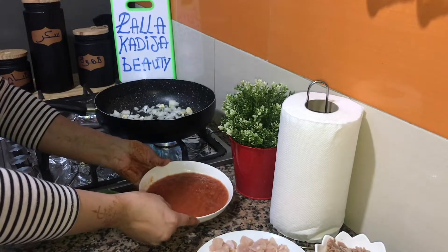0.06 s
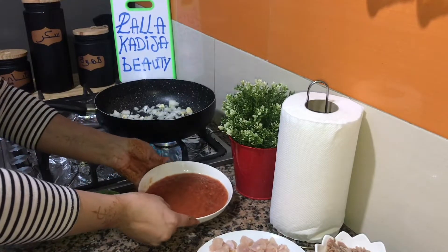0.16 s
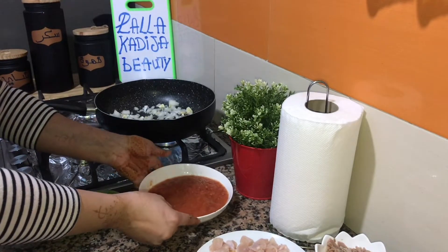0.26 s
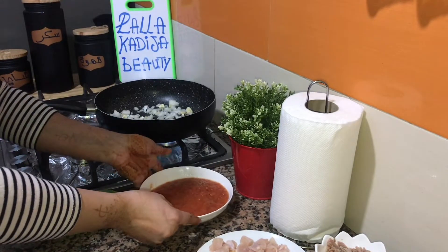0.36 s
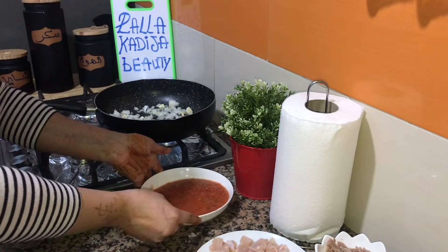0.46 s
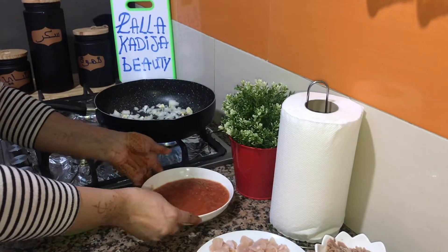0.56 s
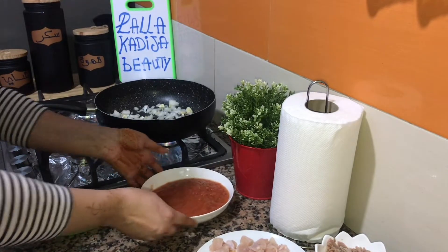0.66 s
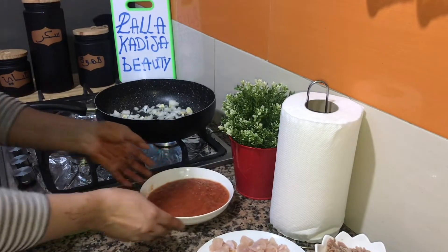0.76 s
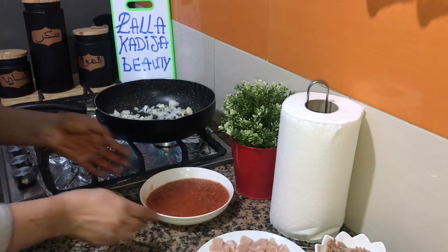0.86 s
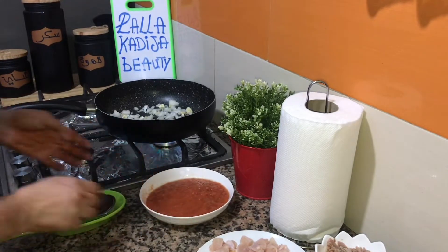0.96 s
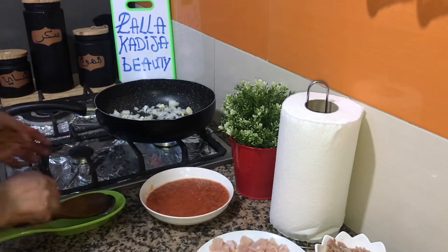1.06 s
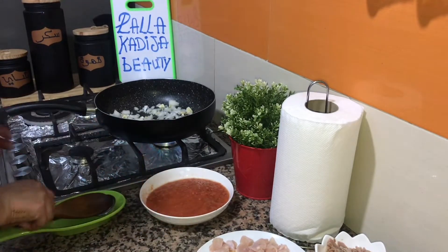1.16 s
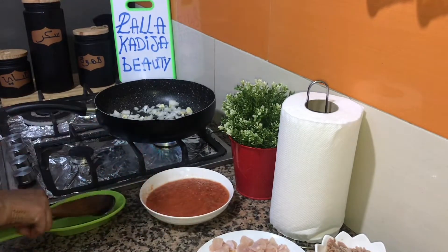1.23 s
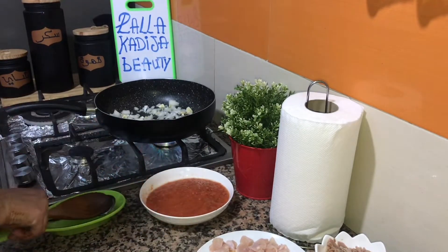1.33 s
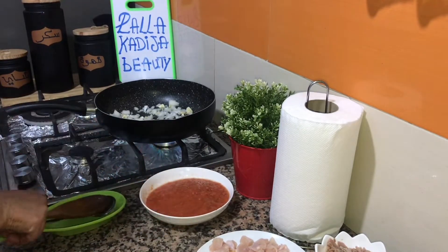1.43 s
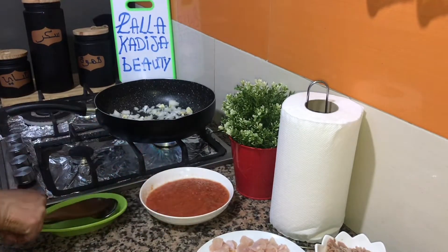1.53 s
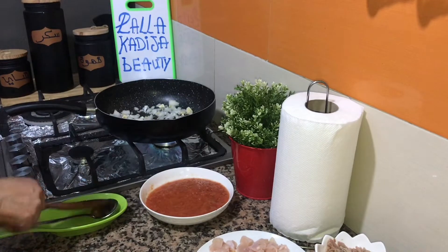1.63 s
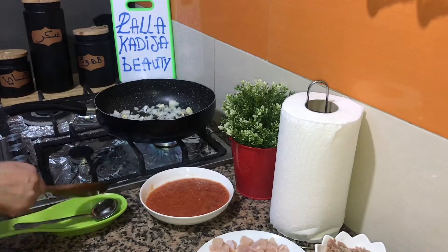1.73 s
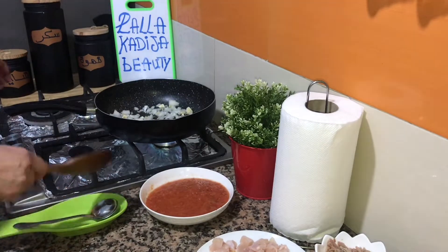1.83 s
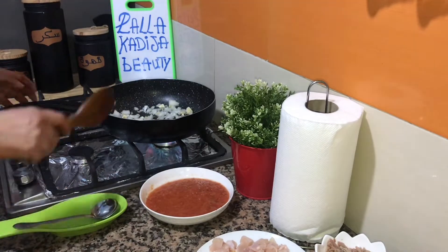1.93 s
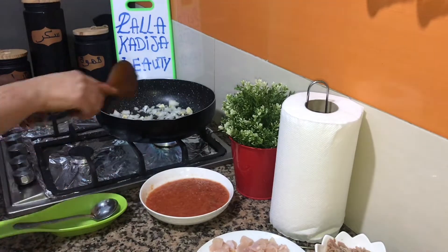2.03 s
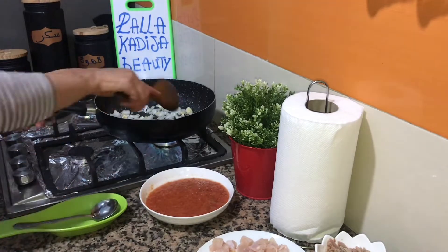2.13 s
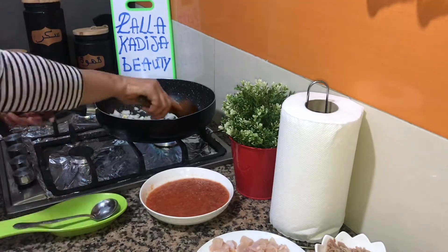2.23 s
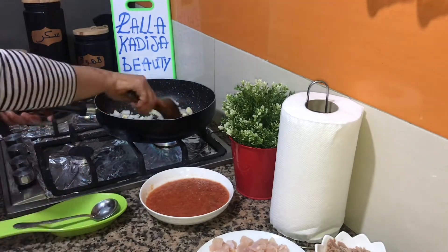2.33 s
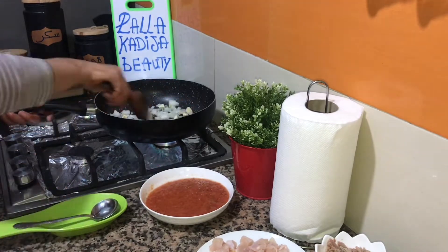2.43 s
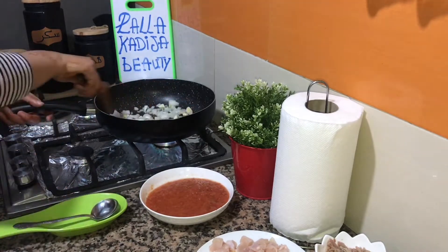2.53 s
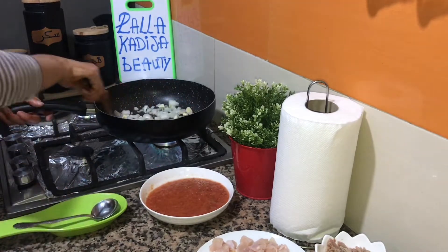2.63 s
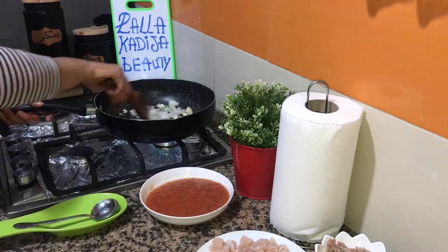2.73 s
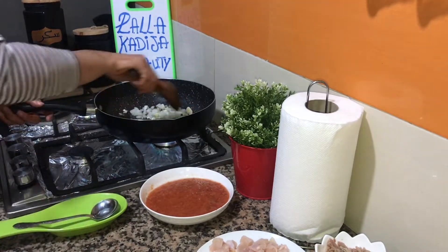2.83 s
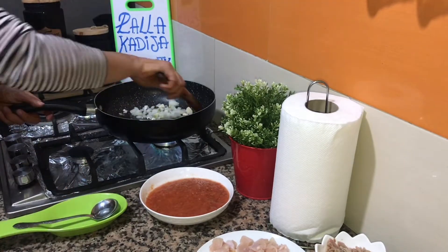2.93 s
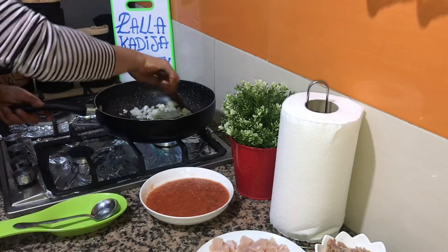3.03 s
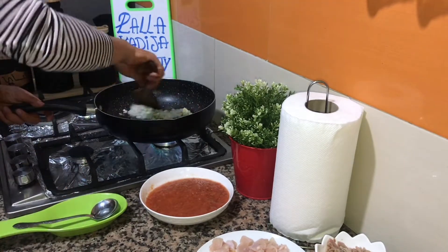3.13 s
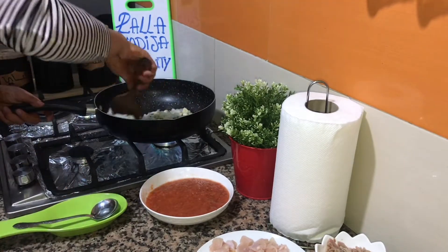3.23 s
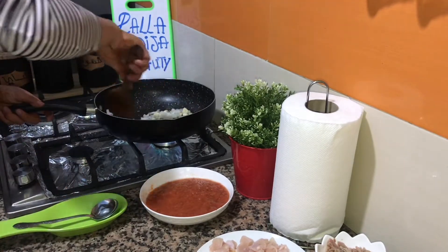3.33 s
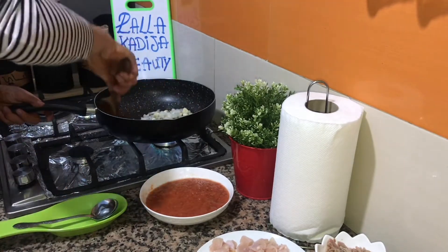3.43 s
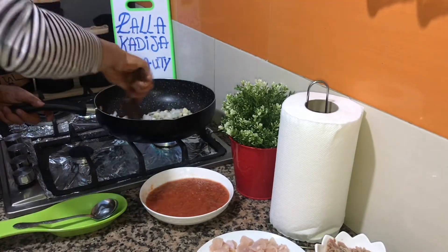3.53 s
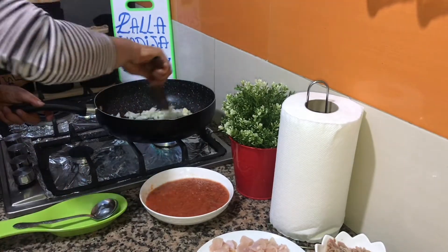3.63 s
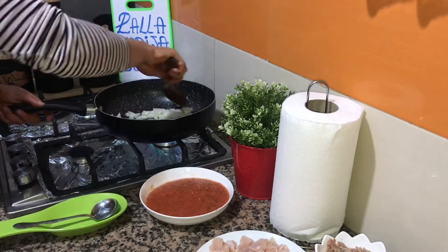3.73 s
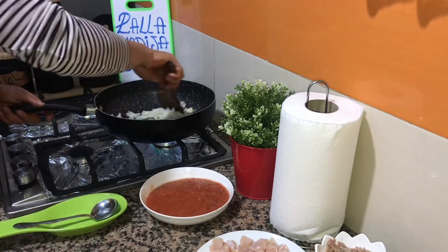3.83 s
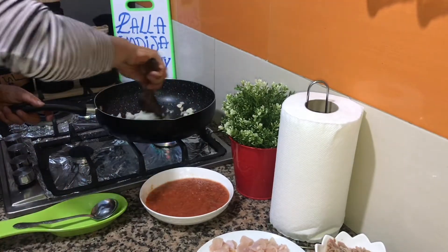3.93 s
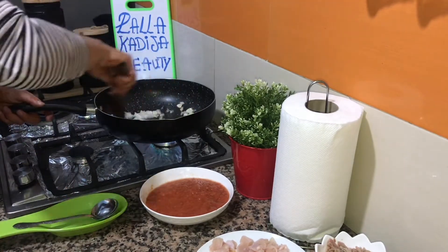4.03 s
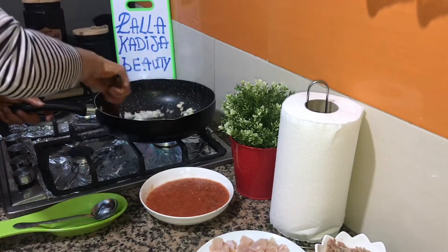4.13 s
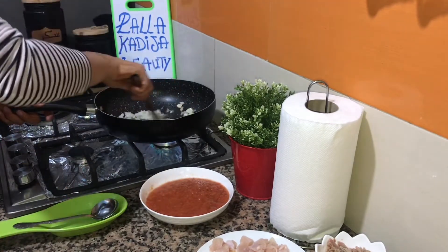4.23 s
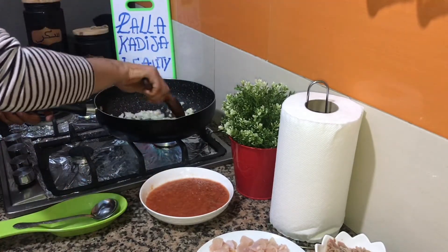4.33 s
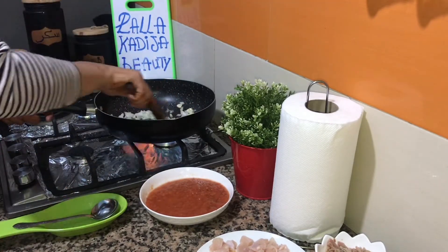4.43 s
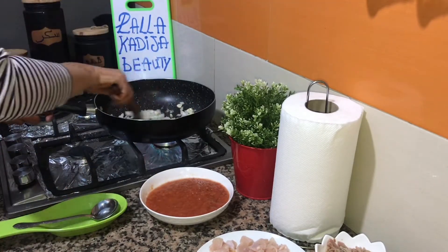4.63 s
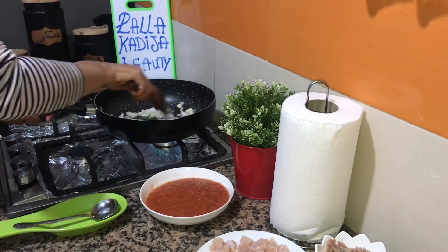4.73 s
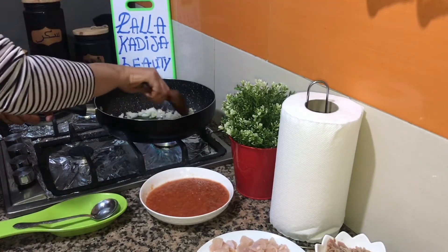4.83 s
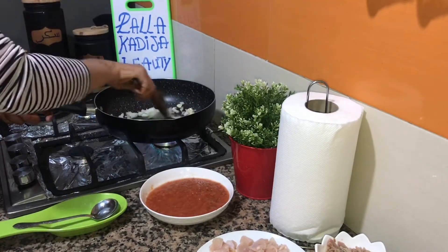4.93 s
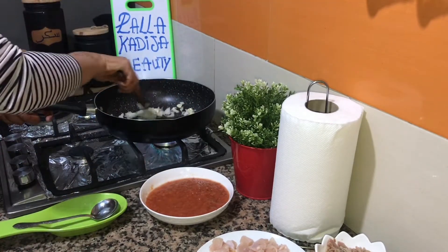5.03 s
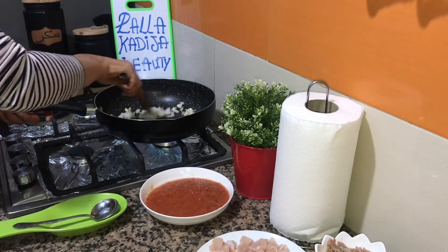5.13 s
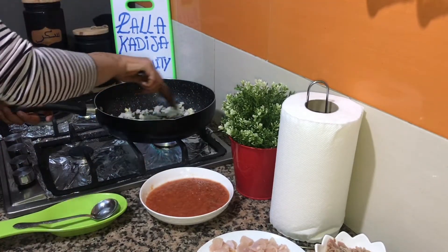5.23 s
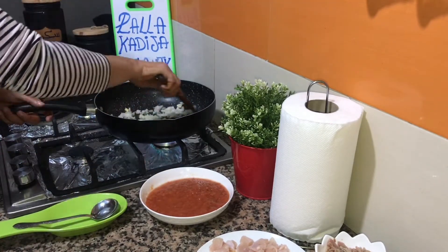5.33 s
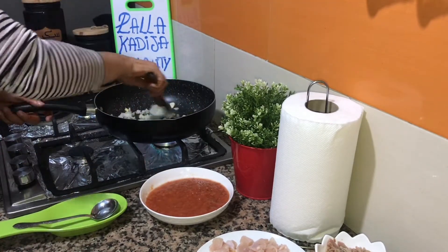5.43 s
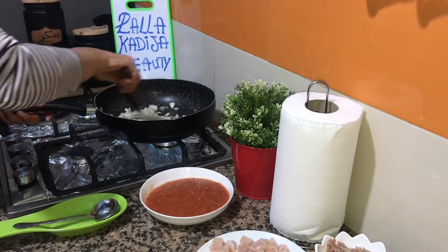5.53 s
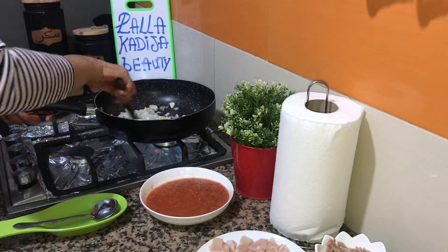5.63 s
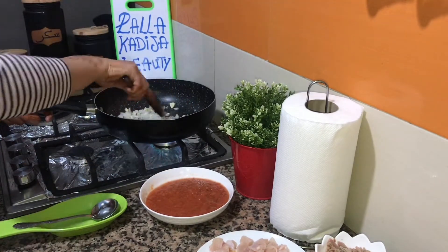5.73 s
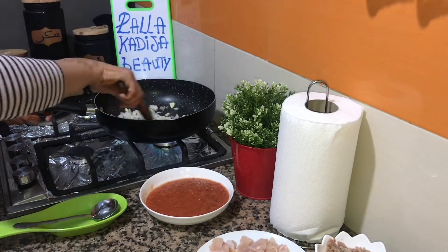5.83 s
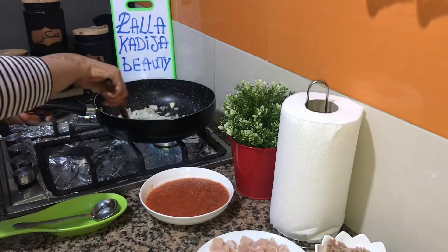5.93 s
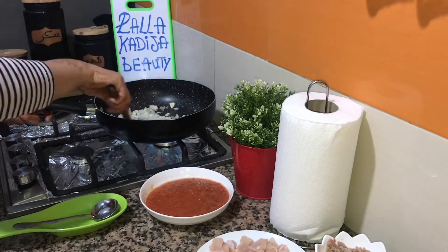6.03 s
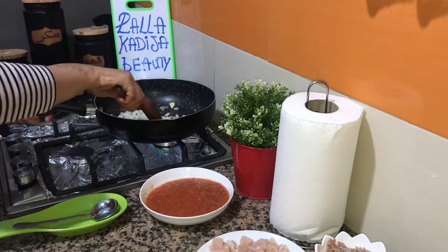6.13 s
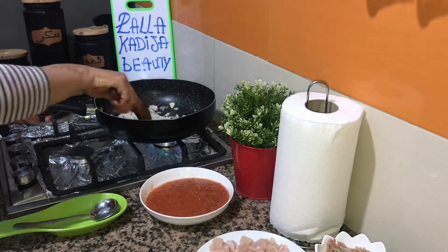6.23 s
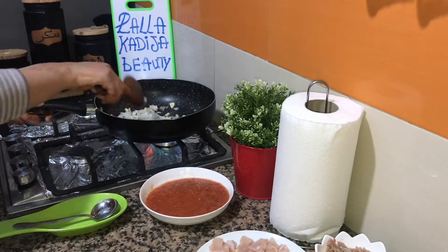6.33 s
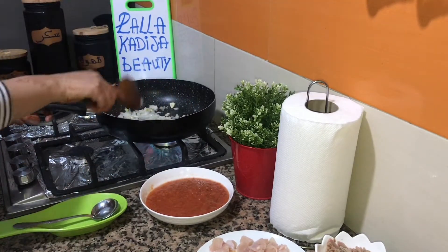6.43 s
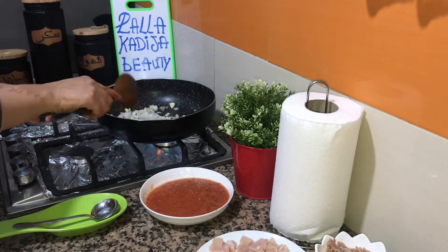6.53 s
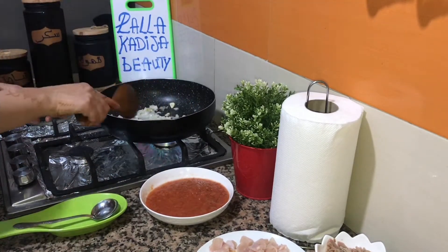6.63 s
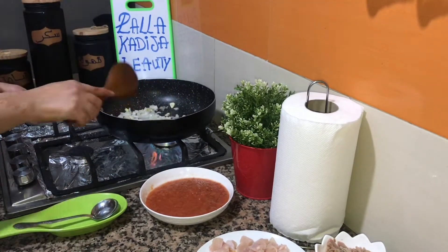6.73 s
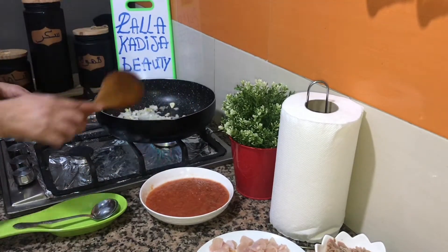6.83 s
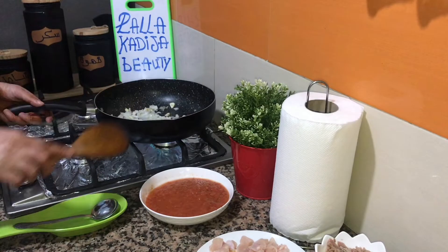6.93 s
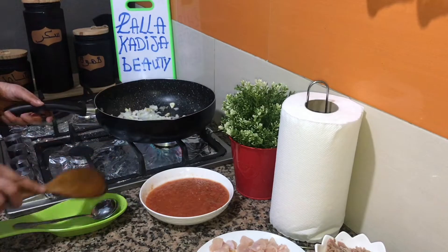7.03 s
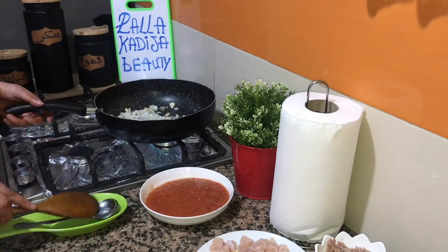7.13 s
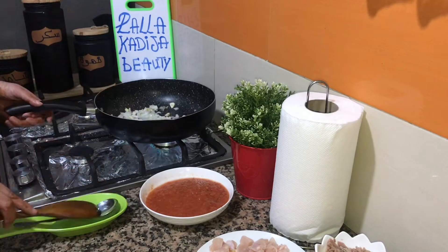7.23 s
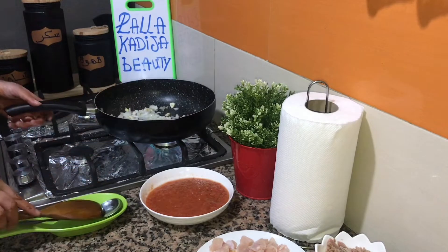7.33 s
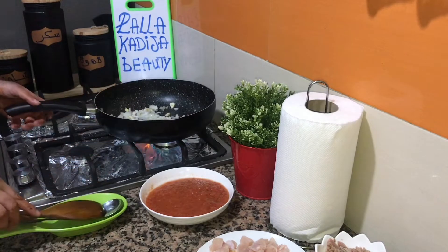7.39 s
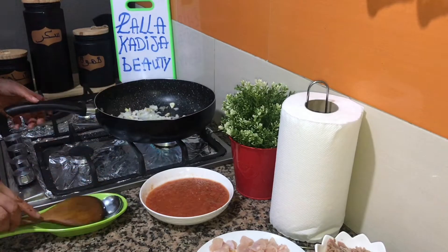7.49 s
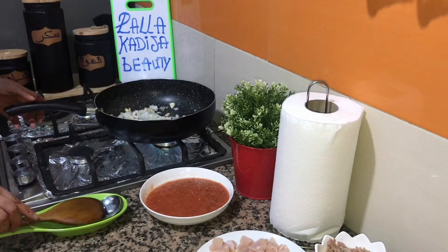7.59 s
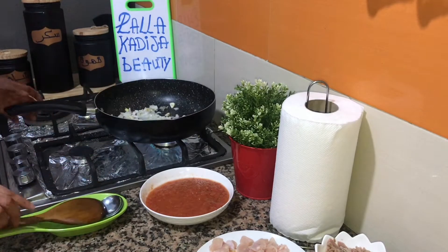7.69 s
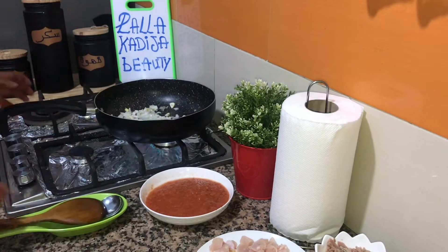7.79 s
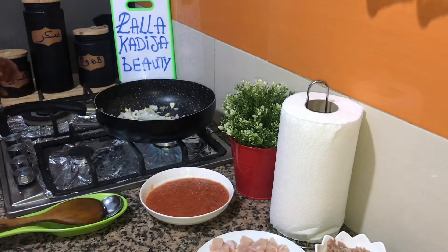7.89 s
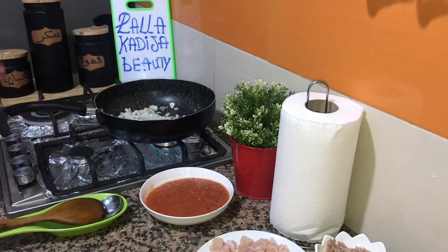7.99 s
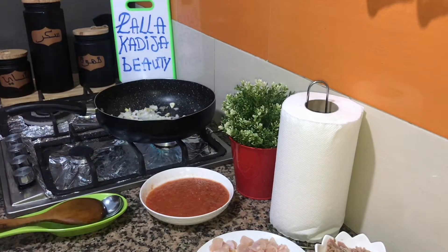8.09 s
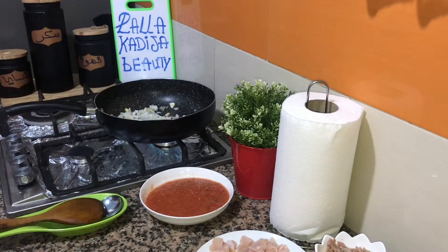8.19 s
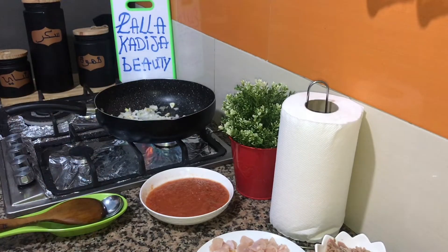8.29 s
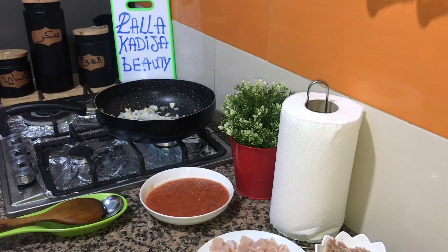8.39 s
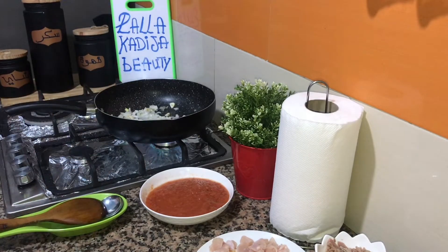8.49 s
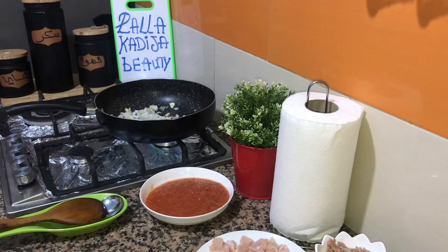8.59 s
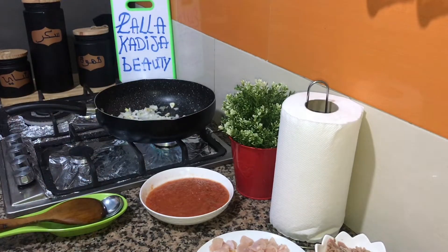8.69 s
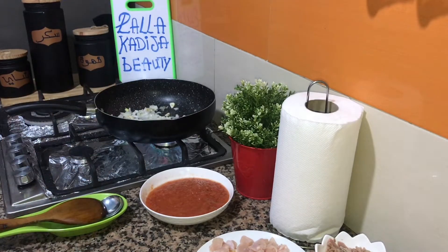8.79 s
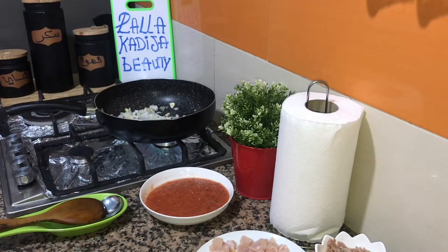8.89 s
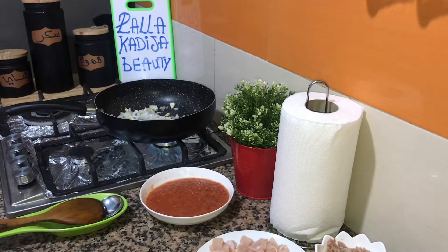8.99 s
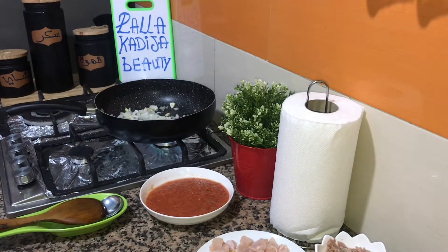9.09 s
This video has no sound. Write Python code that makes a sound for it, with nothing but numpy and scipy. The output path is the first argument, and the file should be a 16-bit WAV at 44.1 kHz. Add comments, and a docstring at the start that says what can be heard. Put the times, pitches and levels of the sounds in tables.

```python
"""Stirring onions in a home kitchen

A wooden spoon, lifted off two steel ones in a plastic rest, stirs a coated pan on a gas stove, is knocked
on the rim and laid back; a bowl is set on a stone counter first. Contacts ring decaying modes under noise
cracks; drags are noise through the pan's resonances. Patchy noise makes the hiss of frying and scraping,
soft rustle and low rumble. Noise tails give the hard-walled room; one microphone listens from a step away."""
import sys
import numpy as np
from scipy import signal
from scipy.fft import rfft, irfft, next_fast_len
from scipy.io import wavfile
from scipy.ndimage import uniform_filter1d, map_coordinates

SR = 44100
rng = np.random.default_rng(int(sys.argv[2]) if len(sys.argv) > 2 else 0)


def wrap_up_sound(samples):
    """Save the sound to the file named by the first command line argument, as 16-bit audio."""
    columns = np.atleast_2d(samples).T
    # keep every value between -1 and 1, then stretch to whole-number steps
    tamed = np.clip(columns, -1, 1)
    steps = np.round(tamed * 32767).astype(np.int16)
    wavfile.write(sys.argv[1], SR, steps)


def natural_amplitude(level_db):
    """Convert a level in decibels to a linear amplitude factor, elementwise."""
    exponent = np.asarray(level_db, float) / 20
    return 10 ** exponent


N = 403515  # samples

# resonances of the coated pan: f/Hz, level/dB, t60/s
PAN_MODES = [(95, -4, .25), (125, -4, .25), (185, -3, .18), (215, 4, .13), (275, -5, .18), (321, -3, .22),
             (433, 7, .13), (477, 7, .12), (585, -6, .15), (649, -5, .15), (685, -4, .07), (845, -5, .07),
             (975, -6, .06), (1055, -4, .06), (1210, -4, .05), (1460, -4, .04), (1720, -1, .03),
             (2020, -9, .03), (2565, -11, .08), (3400, -12, .02), (3900, -12, .08), (7000, -13, .06)]
# strokes of the spoon through the onions: start t/s, length/s, scrape hiss level/dB, drag level/dB
STIR_STROKES = [(2.145, 0.33, -50, -58), (2.64, 0.17, -51.5, -52), (2.954, 0.28, -53.5, -54),
                (3.192, 0.034, -58, -48), (3.426, 0.28, -57, -58), (3.823, 0.13, -59.5, -56.5),
                (4.1, 0.1, -56.5, -47), (4.364, 0.049, -61.5, -79), (4.61, 0.042, -58, -48),
                (4.846, 0.047, -56.5, -66), (5.102, 0.14, -61, -59), (5.35, 0.061, -60.5, -56.5),
                (5.625, 0.19, -68, -60.5)]
STROKE_RISE_S = 0.039


def unit(x):
    """Scaled to rms 1."""
    return x / np.sqrt(np.mean(x ** 2) + 1e-20)


def along(points, hz):
    """(Hz, value) points read off on a log frequency axis."""
    f, v = np.transpose(points)
    return np.interp(np.log(hz + 1), np.log(f + 1), v)


def wobble(rate):
    """A smooth random curve, rate knots a second."""
    knots = rng.standard_normal(int(N * rate / SR) + 4)
    return map_coordinates(knots, [np.arange(N) * rate / SR])


def filtered(x, response):
    """x times a response of frequency."""
    m = next_fast_len(len(x) + 4096)
    return irfft(rfft(x, m) * response(np.fft.rfftfreq(m, 1 / SR)), m)[:len(x)]


def noise(spectrum, patchy_db):
    """Coloured noise of rms 1 with patches of random gain in time and frequency."""
    z = signal.stft(rng.standard_normal(N + SR), nperseg=512)[2]
    field = uniform_filter1d(rng.standard_normal(z.shape), size=6, axis=0)
    field = uniform_filter1d(field, size=10, axis=1)
    x = signal.istft(z * natural_amplitude(patchy_db * unit(field)), nperseg=512)[1][:N]
    # close the spectrum beyond both ends
    shut = [(spectrum[0][0] * .7, -120)] + list(spectrum) + [(spectrum[-1][0] * 1.2, -120)]
    return unit(filtered(x, lambda hz: natural_amplitude(along(shut, hz))))


def swells(rows, rise_s, dies_s):
    """Gain per sample: each (start s, length s, dB) row rises, holds to its length, then dies with t60 dies_s."""
    t = np.arange(N) / SR
    power = np.zeros(N)
    for s, length, db in rows:
        rise = np.clip((t - s) / rise_s, 0, 1) ** 2
        power += natural_amplitude(2 * db - 120 * np.maximum(t - s - length, 0) / dies_s) * rise
    return np.sqrt(power)


def struck(hits, modes, colour, ring_db, crack_db, crack_s, rise_s, loose):
    """Each contact rings decaying modes at fresh strengths under a noise crack; colour tilts both, in dB."""
    out, t = np.zeros(N + SR), np.arange(SR // 3) / SR
    hz, db, t60 = np.transpose(modes)[:, :, None]
    for s, level_db, *tilt in hits:
        shape = colour(*tilt)
        strength_db = db + along(shape, hz) + rng.normal(0, 2, hz.shape)
        size = natural_amplitude(strength_db - 60 * t / np.abs(t60))
        pitch = hz * (1 + loose * rng.standard_normal(hz.shape))  # the grip shifts each mode a little
        swell = 1 - np.exp(-t * hz / 1.97)  # each mode takes a cycle or two to build
        side = (-1) ** np.arange(len(hz))[:, None]  # neighbours start in opposite senses: close pairs swell first
        ring = (side * size * swell * np.sin(2 * np.pi * pitch * t)).sum(axis=0)
        burst = rng.standard_normal(len(t)) * natural_amplitude(-60 * t / crack_s)
        crack = filtered(burst, lambda f: natural_amplitude(along(shape, f)) * np.sqrt(1000 / (f + 600)))
        sound = natural_amplitude(ring_db) * ring + natural_amplitude(crack_db) * crack
        out[round(s * SR):][:len(t)] += natural_amplitude(level_db) * sound * (1 - np.exp(-t / rise_s))
    return out[:N]


def pan_knocks():
    """Wood on coated metal rings stove, pan floor and rim; the floor rings relatively more under strong blows."""
    # wooden spoon on the pan: t/s, level/dB, stove thud level/dB, wood level/dB, rim level/dB
    pan_hits = [(2.2573, -16.5, -12, -3.5, -19), (2.585, -34.5, -1.5, 3, -7), (2.596, -21, -2, -6, -18),
                (2.971, -18, -10.5, -22.5, -26.5), (3.415, -22.5, -12.5, -5, -19),
                (3.449, -21.5, -11, -13, -29), (3.828, -38, -4.5, -50, -18), (4.1225, -25.5, -6, 0, -56),
                (4.412, -27.5, -7, -26, -29), (4.646, -15.5, -15, -18, -35.5),
                (4.875, -25.5, -10.5, -31, -53), (5.13, -37, -30, -24, -23.5),
                (5.169, -37.5, -30, -33, -47), (5.371, -34.5, -10, -32, -34), (5.608, -32, -4.5, -3, -9),
                (5.85, -30.5, -7, -36, -30.5), (6.06, -40.5, -9, -37, -32)]
    # the spoon knocked clean on the rim: t/s, level/dB, stove thud level/dB, wood level/dB, rim level/dB
    rim_knocks = [(6.4821, -13, -9, -16.5, -22.5), (6.634, -17, -5, -12.5, -25.5)]

    def colour(thud, floor, wood, rim):
        return [(45, thud - 20), (100, thud + 4), (330, thud + 4), (420, floor + 8), (490, floor + 8),
                (600, 0.016), (1100, 0.14), (1900, wood + 8), (4500, rim + 8), (14000, rim + 2)]

    floor_db, floor_grows = 0.5, 0.81  # dB for a hit of level 0 dB, dB per dB of hit level
    floor_from_rim_db = -19.5  # what reaches the pan floor from the rim
    hits = [(s, db, thud, floor_db + floor_grows * db, wood, rim) for s, db, thud, wood, rim in pan_hits]
    hits += [(s, db, thud, floor_from_rim_db, wood, rim) for s, db, thud, wood, rim in rim_knocks]
    return struck(hits, PAN_MODES, colour, ring_db=-7, crack_db=14, crack_s=.045, rise_s=0.0017, loose=0.0074)


def stirring():
    """Uneven friction feeds the pan's resonances, damped by the food to a common 70 Hz width."""
    slips = rng.standard_normal(N) * natural_amplitude(4 * wobble(60) + 2.5 * wobble(17))

    def body(f):
        total = 0
        for k, (centre, db, _) in enumerate(PAN_MODES):
            damping = 1j * f * 70
            total = total + (-1) ** k * natural_amplitude(db) * damping / (centre * centre - f * f + damping)
        return total

    tilt = [(100, -16.0), (220, -13.0), (600, 14.5), (1000, 16.5), (1500, 2), (4000, -70)]  # Hz, dB
    drag_rows = [(s, length, db) for s, length, _, db in STIR_STROKES]
    drag = swells(drag_rows, STROKE_RISE_S, dies_s=0.43)
    return drag * unit(filtered(slips, lambda f: body(f) * natural_amplitude(along(tilt, f))))


def sizzle():
    """A fine flickering hiss, swelling with each scrape; about six times a second a tick in the treble."""
    # colour of the hiss: f/Hz, level/dB per Hz
    fry = [(300, -16), (1000, -3), (2500, -0.5), (4700, -3), (5700, -2.5), (7600, -5.5), (8300, -5),
           (12000, -3.5), (15600, -4.5)]
    # the hiss swells by itself: start t/s, length/s, level/dB
    lone_swells = [(0.78, 0.2, -58.5), (1.086, 0.93, -63), (8.713, 0.15, -62)]
    crackle = natural_amplitude(0.33 * wobble(670) + 0.25 * wobble(15))
    ticks = np.zeros(N)
    drops = rng.random((int(6 * N / SR), 2))  # when, how strong
    ticks[(drops[:, 0] * N).astype(int)] = natural_amplitude(9.3 * drops[:, 1])
    decay = natural_amplitude(-60 * np.arange(SR // 10) / SR / 0.069)  # t60 in s
    puffs = signal.fftconvolve(ticks, decay)[:N]
    treble = noise([(8000, -12), (11000, 0), (14000, -1), (15800, 0)], patchy_db=5)
    scrapes = [(s, length, db) for s, length, db, _ in STIR_STROKES]  # the spoon's scrape hisses with each stroke
    alone_db = -65  # the pan left alone
    strength = np.hypot(natural_amplitude(alone_db), swells(scrapes + lone_swells, STROKE_RISE_S, dies_s=0.85))
    hiss = unit(crackle * noise(fry, patchy_db=2.6))
    return strength * (hiss + natural_amplitude(-1) * puffs * treble)


def spits():
    """Drops of water bursting in the oil: two short treble modes under a noise crack."""
    # oil spitting: t/s, level/dB, low level/dB
    spit_hits = [(7.9803, -57.5, -20), (8.113, -49.5, -16), (8.1665, -31.5, -15), (8.4632, -58, -7),
                 (8.954, -67, -4), (9.0104, -54.5, -18)]
    # modes of a drop: f/Hz, level/dB, t60/s
    drop_modes = [(9650, 0.026, 0.014), (13400, 0.0097, 0.013)]

    def colour(low):
        return [(500, low - 8), (2000, low + 8), (6000, low + 5), (9000, 0.0045)]

    return struck(spit_hits, drop_modes, colour, ring_db=-12, crack_db=12, crack_s=.03, rise_s=.0003, loose=.03)


def rattles():
    """The big spoon rocks on in quick contacts with uneven gaps and uneven strength."""
    # bouts of rocking: start t/s, length/s, level/dB, loudest near f/Hz
    bouts = [(1.342, 0.011, -31, 5000), (1.363, 0.028, -20, 3100), (7.239, .03, -22, 3950),
             (7.271, .04, -31.5, 5480), (7.497, .05, -19.5, 5460)]
    gap_s, low_db, treble_db = .007, -10, -15  # mean time between contacts, then their colour
    rows = []
    for start, length, db, hz in bouts:
        count = int(np.ceil(length / gap_s))
        when, weak = rng.random((12, 2))[:count].T
        times = start + gap_s * (np.arange(count) + 0.96 * when)
        rows += [(s, db - 6 * w, low_db, treble_db, hz) for s, w in zip(times, weak)]
    return rows


def steel(knock, treble, struck_hz):
    """Colour of one jolt: plastic below, steel above, modes nearest the struck part louder."""
    hz = np.geomspace(400, 16000, 60)
    points = [(450, knock - 12), (1100, knock + 9), (2600, 0.65), (7000, 0.85),
              (9500, treble + 9), (16000, treble + 9)]
    lift_db, width_octaves = 6.5, 0.12
    lift = lift_db * np.exp(-(np.log2(hz / struck_hz) / width_octaves) ** 2)
    return np.transpose([hz, along(points, hz) + lift])


def big_spoon():
    """The large steel spoon clatters in its plastic rest, in single jolts and rattles."""
    # jolts in the rest: t/s, level/dB, low level/dB, treble level/dB, loudest near f/Hz
    jolts = [(1.2713, -18, -9, -12, 6400), (1.2790, -21, -11, -8, 6400), (1.2900, -22.5, -10.5, -23, 3700),
             (1.3290, -20.5, -22, -7.5, 5000), (1.3578, -18.5, -28, -10, 6400), (1.49, -21, -8, -15, 6000),
             (7.263, -31.5, -6, 5.5, 7200), (7.4684, -19, -3.5, -6.5, 1380), (7.4749, -5, -11, -7, 3700),
             (7.4884, -8, -34.5, -1, 6800), (7.563, -24, -25, -4, 7000), (7.582, -27.5, -33, -9, 7000)]
    # modes of the large spoon: f/Hz, level/dB, t60/s
    big_modes = [(1080, -5, .05), (1250, -6.5, .04), (1510, -5, 0.034), (2354, -4, 0.074),
                 (2480, -4, 0.053), (3100, 3.5, 0.063), (3480, -1.5, 0.058), (3630, -2, .04),
                 (3700, -4, 0.062), (4016, -1.5, .04), (4410, -4.5, 0.065), (4700, -15, 0.062),
                 (5270, -9, 0.045), (5560, -6.5, 0.077), (5840, -9.5, 0.048), (6400, 2.5, 0.037),
                 (6950, 0.5, .045), (7100, -1.5, .045), (8000, -13.5, .04), (8900, -1.5, 0.053),
                 (9500, -4, 0.073), (11900, 1.5, 0.07), (13040, -2, .08), (13275, -4.5, .06),
                 (13900, -1, 0.069), (14225, -5, .06), (15400, -6.5, .07), (15340, -6.5, 0.046)]
    return struck(jolts + rattles(), big_modes, steel,
                  ring_db=-18, crack_db=7, crack_s=0.028, rise_s=0.0014, loose=0.0038)


def small_spoon():
    """The small steel spoon rings free: longer, higher modes with hardly any shift in pitch."""
    # chimes: t/s, level/dB, low level/dB
    chimes = [(1.5949, -26, -3), (1.6094, -26, -3), (7.3113, -31, -6), (7.3274, -32.5, -17)]
    # modes of the small spoon: f/Hz, level/dB, t60/s
    small_modes = [(4030, -13, .06), (4500, -11, .07), (6277, -7, .1), (7150, -12, .05), (8710, 0, .09),
                   (11290, 0, .15), (12970, -8, .18), (13920, -5, .1), (15170, -8, .14), (15410, 0, .11)]

    def colour(low):
        return [(600, low - 25), (3000, low - 5), (6300, low + 8), (8500, 0.0038)]

    return struck(chimes, small_modes, colour,
                  ring_db=-9.5, crack_db=6.5, crack_s=0.035, rise_s=0.0014, loose=0.00041)


def rest_clacks():
    """The plastic rest clacks under the wooden spoon: a few short modes and a crack."""
    # wooden spoon on the rest: t/s, level/dB, high level/dB
    clacks = [(1.521, -21, -12), (7.217, -35, -6), (7.2315, -13, -17)]
    # modes of the rest: f/Hz, level/dB, t60/s
    rest_modes = [(1110, -4, 0.03), (1290, -2, 0.03), (1450, -3, 0.025), (1618, 0, 0.025)]

    def colour(high):
        return [(400, -19.5), (1000, -3.0), (1700, -3.5), (3500, high + 6), (10000, high - 12)]

    return struck(clacks, rest_modes, colour,
                  ring_db=-5.5, crack_db=8.5, crack_s=0.069, rise_s=0.00039, loose=0.032)


def bowl():
    """Glazed clay on stone, damped by the hands: a dry tick."""
    # bowl touching the counter: t/s, level/dB, low level/dB, high level/dB
    bowl_hits = [(0.182, -11, -14.5, -32), (0.4947, -12.5, -16.5, -21.5)]
    # modes of the bowl: f/Hz, level/dB, t60/s
    bowl_modes = [(900, -5, 0.026), (1130, -15, 0.031), (1360, -6, .022), (1662, -1, 0.035),
                  (2380, 4, 0.025)]

    def colour(low, high):
        return [(150, low - 8), (500, low + 5), (1100, 0.0039), (1600, 0.0093),
                (3300, high + 11), (4800, high - 12), (9000, high - 19)]

    return struck(bowl_hits, bowl_modes, colour,
                  ring_db=-11.5, crack_db=16, crack_s=0.015, rise_s=0.00024, loose=0.026)


def rustle():
    """Soft rustle near the counter: patchy mid-range noise in two brief swells."""
    # rustles: start t/s, length/s, level/dB
    rustle_rows = [(7.95, 0.044, -59.5), (8.82, 0.037, -51.5)]
    # colour of the rustle: f/Hz, level/dB per Hz
    cloth = [(150, -9.5), (500, 5), (1500, -2.5), (4000, -7), (7000, -38)]
    return swells(rustle_rows, rise_s=0.023, dies_s=0.8) * noise(cloth, patchy_db=2.5)


def hush():
    """Room rumble and gas flame: steady low noise, its level barely wavering."""
    # colour of the rumble: f/Hz, level/dB per Hz
    rumble = [(25, 1), (55, -7), (75, -6.5), (90, 7), (110, -9.5), (135, -8), (220, -10.5), (400, -16.5),
              (700, -22), (1300, -31), (1750, -26), (2600, -57.5), (6000, -63)]
    return natural_amplitude(-50 + 0.079 * wobble(1.5)) * noise(rumble, patchy_db=3.0)


def kitchen(x):
    """Tiled walls: a dense decaying noise tail, drawn afresh for each quarter second of sound."""
    # decay of the room: f/Hz, t60/s
    room_decay = [(100, .55), (1000, .6), (3500, .56), (7000, .46), (12000, .34)]
    out, step, tail_n = np.zeros(N + 2 * SR), SR // 4, SR * 2 // 3
    for a in range(0, N, step):
        hz, t, z = signal.stft(rng.standard_normal(tail_n), SR, nperseg=256)
        decay = natural_amplitude(-60 * t / along(room_decay, hz)[:, None])
        tail = signal.istft(z * decay, SR, nperseg=256)[1]
        wet = signal.fftconvolve(x[a:a + step], tail / np.linalg.norm(tail))
        out[a + 200:][:len(wet)] += wet  # first wall, 1.5 m further
    return out[:N]


def scene():
    """Near contacts and their room, over the hiss, the rumble and the rustle."""
    dish, pan = bowl(), pan_knocks()
    others = big_spoon() + small_spoon() + rest_clacks() + spits() + stirring()
    # room sends in dB: the bowl stands nearer the microphone, the pan radiates toward it
    room = kitchen(natural_amplitude(-5.5) * dish + natural_amplitude(-5) * pan + natural_amplitude(-2) * others)
    return (dish + pan + others + room + sizzle() + hush() + rustle())[None]


def roll_off(x):
    """The treble ends steeply here."""
    return signal.sosfilt(signal.butter(12, 16850, fs=SR, output="sos"), x)


def record(dry):
    """The microphone's bass cut and housing notch, with nothing passed from 15.9 kHz up."""
    # response of the microphone: f/Hz, level/dB
    port = [(20, -38), (60, 2.5), (9300, 1), (10400, -4), (11300, -0.5)]
    mix = filtered(dry[0], lambda hz: natural_amplitude(along(port, hz)) * (hz < 15900))[None]
    return roll_off(mix)


dry = scene()
out = record(dry)
wrap_up_sound(out)
```